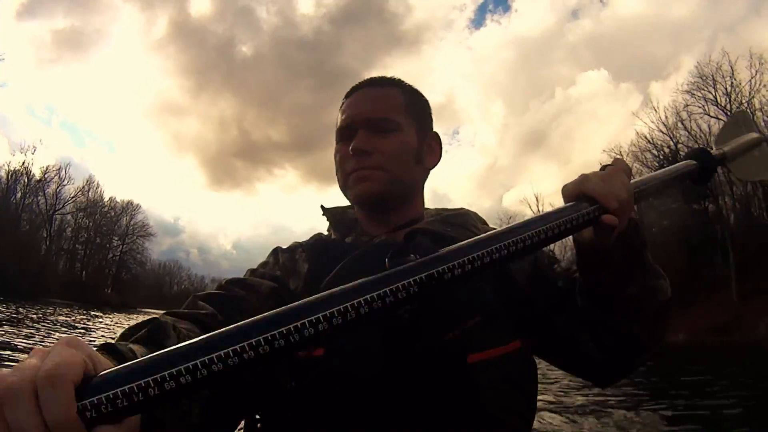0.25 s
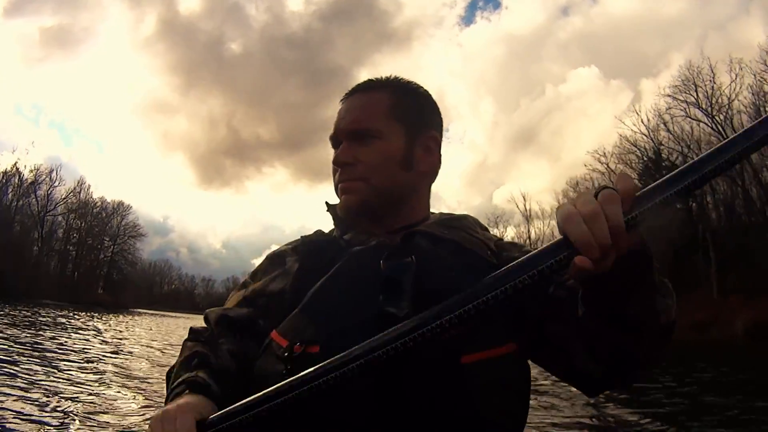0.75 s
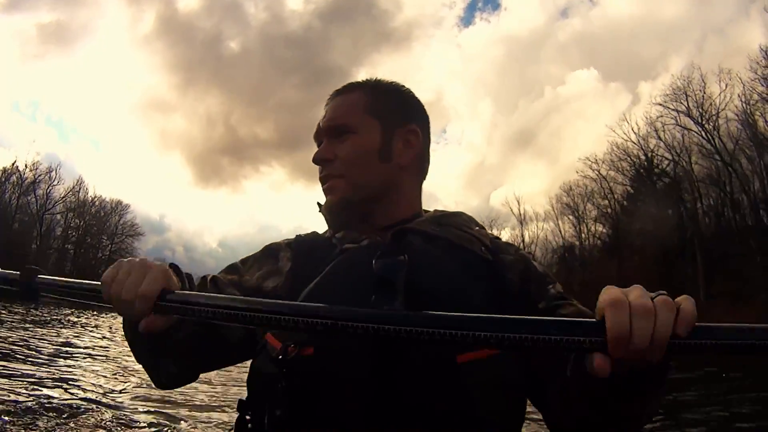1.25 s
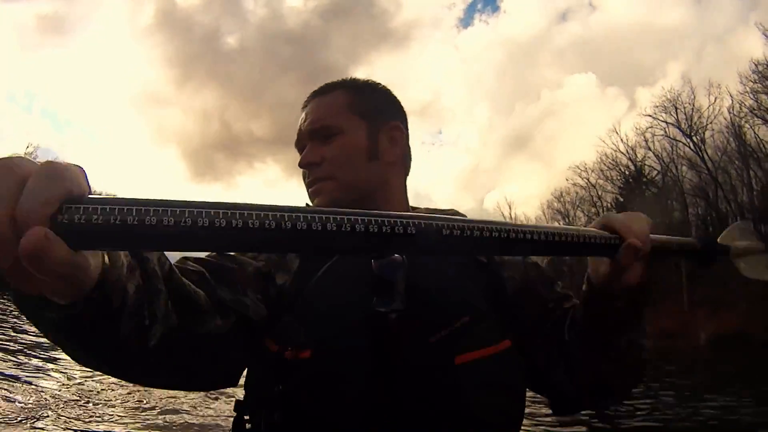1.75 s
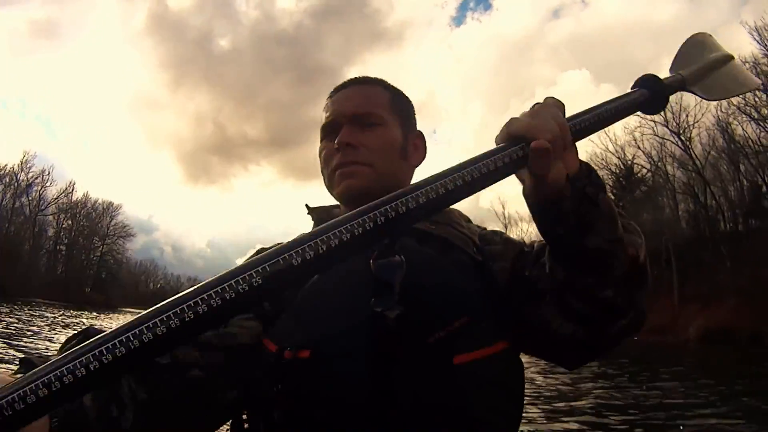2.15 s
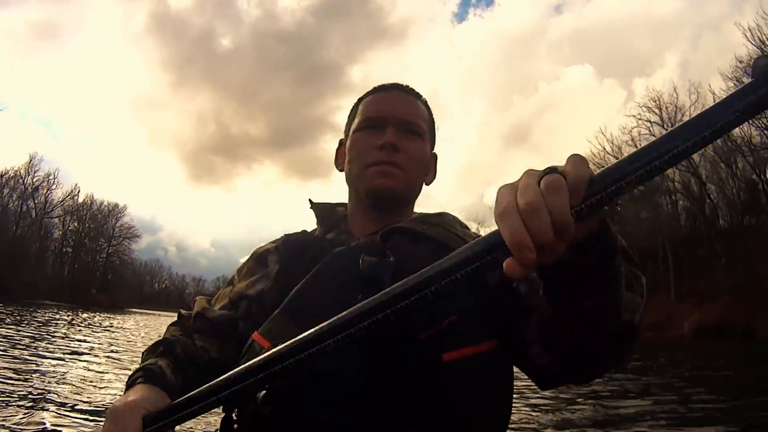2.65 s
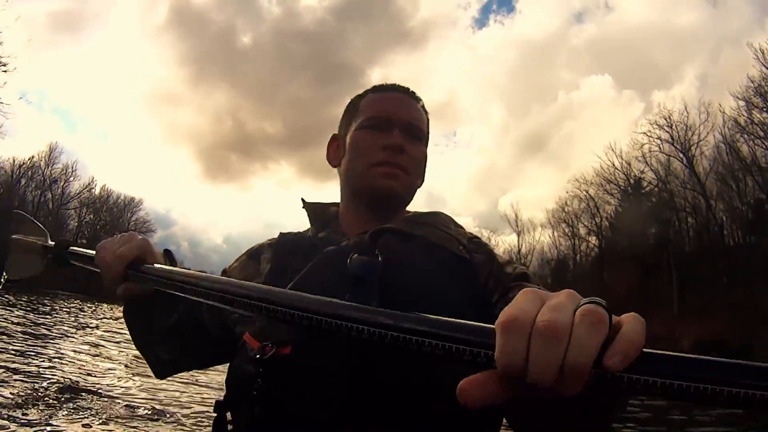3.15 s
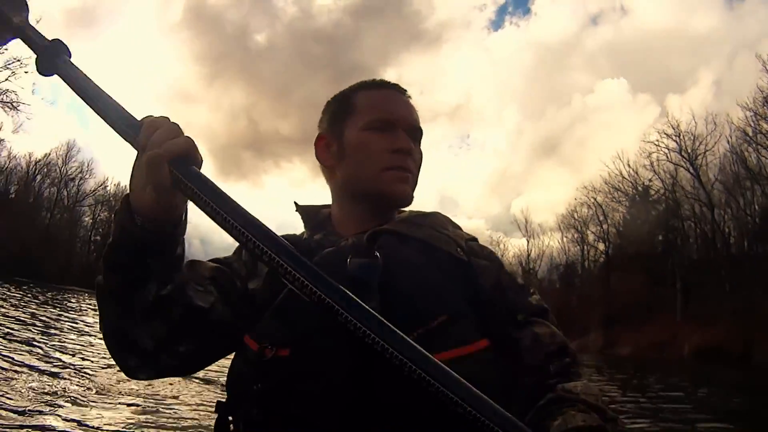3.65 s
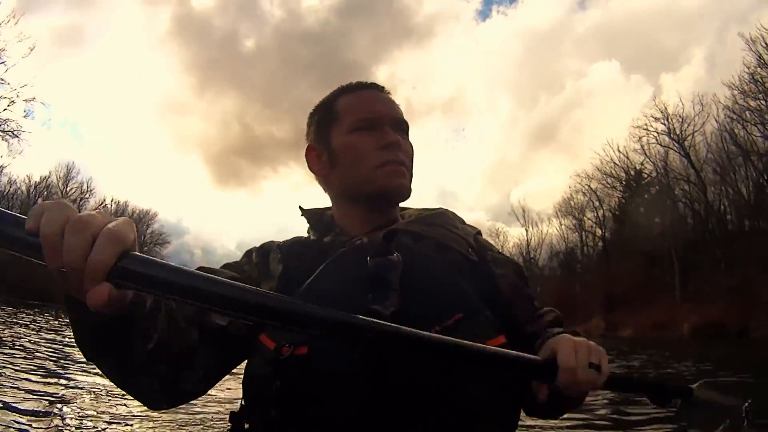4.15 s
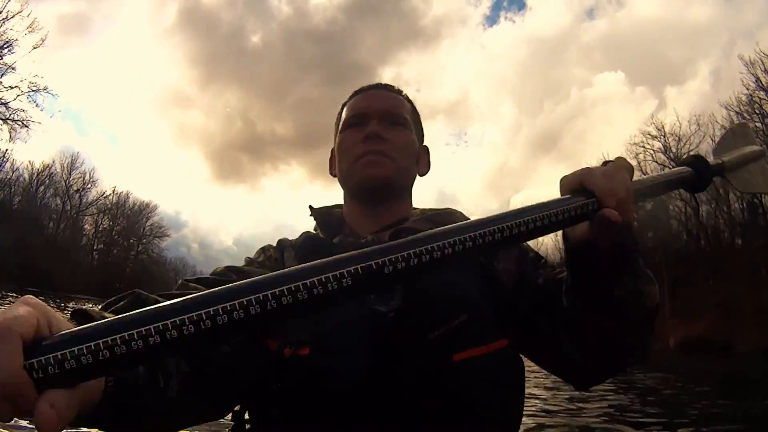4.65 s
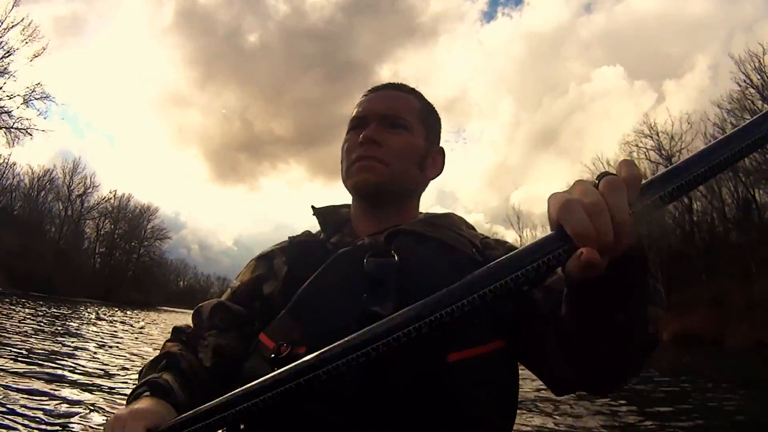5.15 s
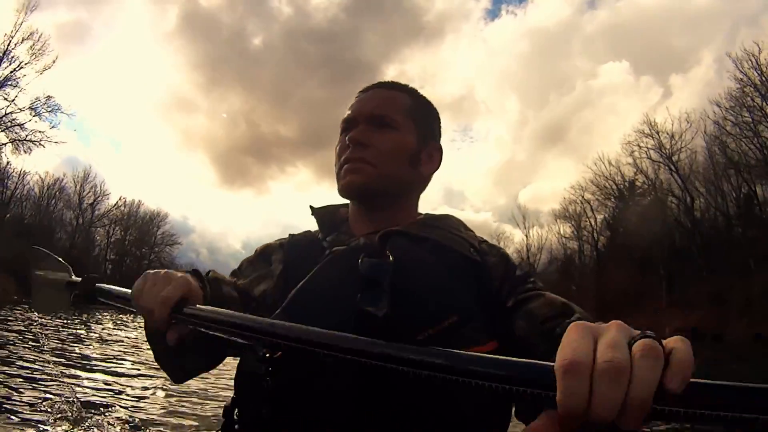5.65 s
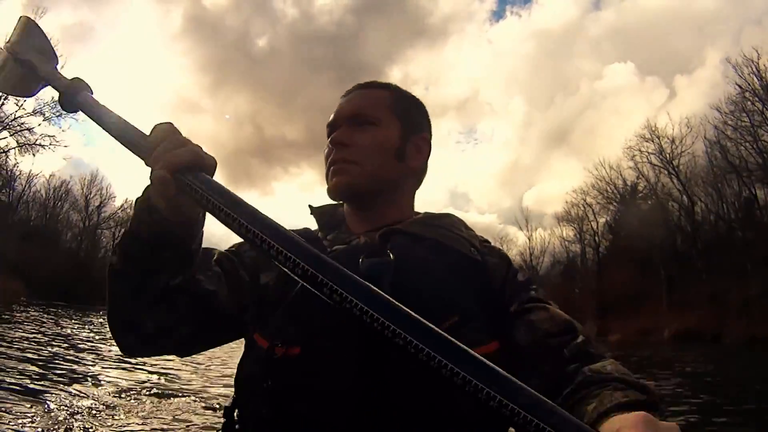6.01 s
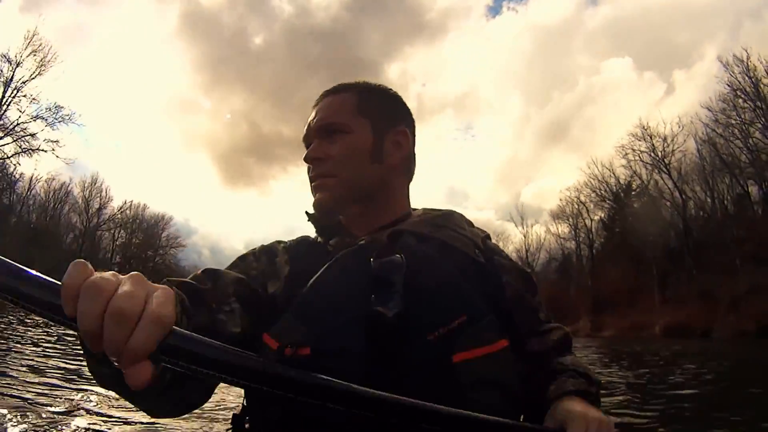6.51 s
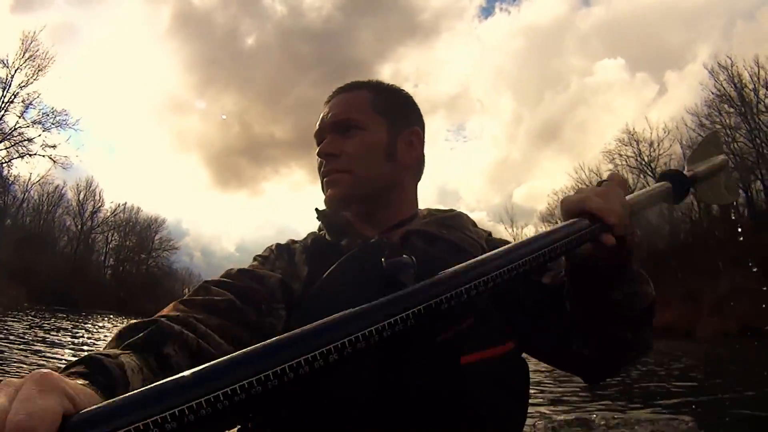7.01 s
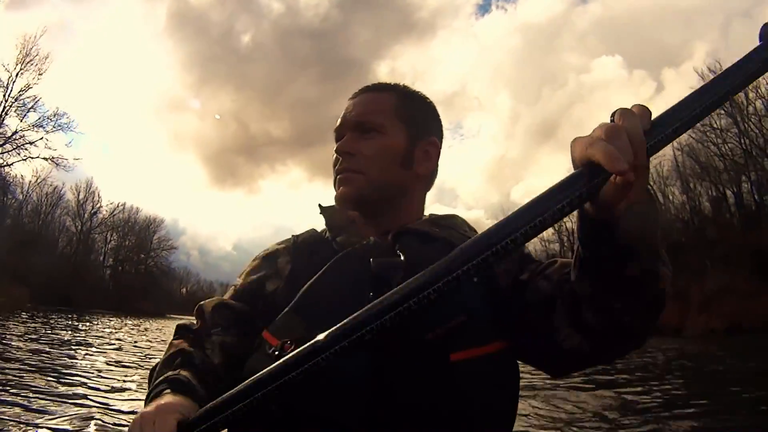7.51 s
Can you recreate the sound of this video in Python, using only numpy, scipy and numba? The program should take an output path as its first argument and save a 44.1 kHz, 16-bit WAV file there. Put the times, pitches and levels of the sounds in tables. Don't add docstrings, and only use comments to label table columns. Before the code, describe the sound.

A kayak paddle dips alternately left and right on a calm lake. Each lifted blade sheds a short bright splash, fine spray and trickling drops, with hollow bubbles plopping along the hull. A hard dull knock strikes the plastic near the middle, and another near the end bounces and scrapes. A tiny bird whistles faintly, very high. The microphone sits on the boat inside a closed, resonant case.

```python
import sys
import numpy as np
from numba import njit
from scipy import signal
from scipy.fft import rfft, irfft, next_fast_len
from scipy.io import wavfile
from scipy.ndimage import uniform_filter1d

SR = 44100
rng = np.random.default_rng(int(sys.argv[2]) if len(sys.argv) > 2 else 0)


def gain_from_decibels(decibels):
    exponent = np.asarray(decibels, float) / 20
    return 10 ** exponent


def to_wav(sig):
    pcm = np.clip(np.atleast_2d(sig), -1, 1) * 32767
    pcm = np.round(pcm).astype(np.int16)
    wavfile.write(sys.argv[1], SR, pcm.T)


N = 342857
T = np.arange(N) / SR
HZ = np.fft.rfftfreq(2 * next_fast_len(N // 2 + 2048), 1 / SR)
FRAMES = np.arange(0, N / SR + .002, .002)


def evened(x):
    return x / np.sqrt(np.mean(x ** 2) + 1e-20)


def read(points, hz, axis=1):
    table = np.transpose(points)
    return np.interp(np.log(hz + 1), np.log(table[0] + 1), table[axis])


def filtered(x, gain):
    size = 2 * (len(HZ) - 1)
    return irfft(rfft(x, size) * gain, size)[..., :N]


def add(mix, s, sound, pan_db=0):
    part = mix[:, round(s * SR):][:, :sound.shape[-1]]
    part += sound[..., :part.shape[1]] * gain_from_decibels(np.array([[pan_db / 2], [-pan_db / 2]]))


# pitch_hz, width_hz, level_db
CASE_MODES = [(98.1, 11, 6), (132, 50, 0), (500, 14.6, 7.5), (764, 47, 5), (1270, 120, 1.5), (1643, 270, 3),
              (2550, 780, 1.5), (5010, 490, -5.5)]


def housing():
    modes = (gain_from_decibels(db) / (1 + 1j * (HZ - f * f / (HZ + 1)) / width) for f, width, db in CASE_MODES)
    return 1 + sum(modes)


# freq_hz, density_db
LAKE_COLOUR = [(68, -10), (88, -0.5), (400, -8), (615, -16.5), (1950, -23.5), (3600, -16.5), (10600, -23),
               (11400, -34)]
LAKE_LEVEL_DB = -54
# time_s, level_db
SWELL = [(0, 0), (1.6, -2), (3.2, 3), (4.3, 1.5), (5.2, 0), (6.1, -3.5), (7.0, -0.5)]
# freq_hz, right_lead_rad, left_minus_right_db, coherence_0_to_1
PORT_PAIR = [(40, -0.67, -0.5, 0.95), (169.5, 0.61, 0.5, 0.99), (560, 1.78, -1.5, 1),
             (880, 1.77, -3.5, 0.6), (2050, 1.44, -3, 0.4), (2730, 0.99, 0.5, 0.24),
             (4630, 0.55, -3.5, 0.16), (10900, 1.08, 0.5, 1)]


def lake():
    frames, hz = N // 128 + 9, np.fft.rfftfreq(512, 1 / SR)
    a, b, c, d, patches = rng.standard_normal((frames, 257, 5)).T
    flicker = evened(uniform_filter1d(rng.standard_normal(frames), 5))
    patches = evened(uniform_filter1d(uniform_filter1d(patches, 5, 0), 12, 1))
    same = np.clip(read(PORT_PAIR, hz, axis=3), 0, 1)[:, None]
    left = a + 1j * b
    right = same * left + np.sqrt(1 - same ** 2) * (c + 1j * d)
    z = np.array([left, right]) * gain_from_decibels(2.0 * patches + 2.3 * flicker)
    z[:, hz < 250] *= gain_from_decibels(np.interp(np.arange(frames) * 128 / SR, *np.transpose(SWELL)))
    noise = signal.istft(z, nperseg=512, noverlap=384)[1][:, :N]
    return gain_from_decibels(LAKE_LEVEL_DB + 1.0) * evened(filtered(noise, gain_from_decibels(read(LAKE_COLOUR, HZ)) * housing()))


# time_s, left_minus_right_db, spray_over_splash_db
BLADE_SIDE = [(0, -2, -6.5), (1.2, 0, -5), (2.0, 0.5, -5.5), (3.0, 1, -7), (4.3, -3.5, -9), (5.1, 2.5, -6),
              (5.5, 0.5, -8), (6.7, -5, -6.5), (7.5, 0.5, -7.5)]


def blade(axis):
    table = np.transpose(BLADE_SIDE)
    return np.interp(T, table[0], table[axis])


def effort(db, start, length, rise, sag, fall):
    before = np.maximum(start - FRAMES, 0)
    during = np.clip(FRAMES - start, 0, length)
    after = np.maximum(FRAMES - start - length, 0)
    return gain_from_decibels(2 * (db - rise * before - sag * during - fall * after))


@njit(fastmath=True)
def burst(length, at, step, cycles, rise, size, swell):
    out = np.zeros((2, length))
    for k in range(len(at)):
        for n in range(min(int(2 / step[k]), length - at[k])):
            u = n * step[k]
            envelope = u * u / (u * u + swell * swell) * (1 - u / 2) ** 3
            tone = np.sin(2 * np.pi * cycles[k] * (u + rise[k] * u * u / 2)) * envelope
            out[0, at[k] + n] += tone * size[0, k]
            out[1, at[k] + n] += tone * size[1, k]
    return out


def grains(colour, per_s, cycles, spread_db, hiss, glide):
    clumps = gain_from_decibels(3.6 * evened(uniform_filter1d(rng.standard_normal(N), 700)))
    when, size, lean, kind, ring, bend = rng.random((6, int(per_s * N / SR)))
    at = np.searchsorted(np.cumsum(clumps) / clumps.sum(), when)
    low_hz, high_hz = colour[1][0], colour[-2][0]
    hz = low_hz * (high_hz / low_hz) ** kind
    turns = cycles * (0.38 + 2.27 * ring ** 2)
    sides = np.array([1.31 + 1.44 * lean, 1.4 - 0.44 * lean])
    size = gain_from_decibels(-spread_db * np.log(size + 0.067)) * hz / np.sqrt(turns) * sides
    bubbles = burst(N, at, hz / turns / SR, turns, glide * (bend - .35), size, 0.18)
    one, two = rng.standard_normal((2, N))
    sheet = np.array([one, 2.1 * one + 0.23 * two]) * np.sqrt(clumps)
    water = evened(bubbles) + hiss * evened(sheet)
    return evened(filtered(water, gain_from_decibels(read(colour, HZ)) * housing()))


# freq_hz, density_db
SPLASH_COLOUR = [(1060, -53), (1800, -11), (2080, -10.5), (2590, -2), (3840, -4.5), (5130, -3), (6500, -10),
                 (8450, -60)]
GURGLE_COLOUR = [(200, -8), (400, -5), (900, 8.5), (1700, -5.5), (2400, -3)]
SPRAY_COLOUR = [(4500, -2.5), (6200, 3.5), (8000, 6), (9600, -7.5), (10900, -2), (11300, -52)]
# start_s, length_s, splash_db, gurgle_db
BLADE_POURS = [(0.0, 0.069, -45.5, -53), (1.067, 0.19, -45.5, -61), (1.984, 0.052, -45, -79),
               (2.417, 0.035, -47.5, -57.5), (2.914, 0.053, -46, -55.5), (3.016, 0.19, -46, -55),
               (4.092, 0.07, -48, -57), (4.204, 0.27, -41.5, -60), (4.769, 0.022, -47.5, -57.5),
               (5.459, 0.024, -44, -76), (5.572, 0.24, -46.5, -60), (5.934, 0.12, -50.5, -86),
               (6.514, 0.28, -39, -52), (6.856, 0.16, -42.5, -60.5), (7.163, 0.27, -51, -75)]
# start_s, splash_db, gurgle_db
THROWN_GOUTS = [(0.366, -39, -79), (0.62, -45.5, -55), (0.911, -39, -49), (1.01, -48, -54),
                (2.82, -54, -55), (3.04, -38.5, -68), (3.721, -50, -41), (3.76, -48, -66),
                (4.2, -43, -51.5), (4.322, -33.5, -72), (5.49, -44.5, -54), (5.54, -65, -56),
                (6.558, -59, -74), (7.04, -61, -62), (7.11, -40, -71), (7.66, -60, -46),
                (7.747, -36.5, -40.5)]


def strokes():
    trickle_db, burble_db = -58, -63.5
    power = gain_from_decibels(2 * np.array([[trickle_db], [burble_db]])) * np.ones(len(FRAMES))
    for s, length, *db in BLADE_POURS:
        power = power + effort(np.c_[db], s, length, rise=303, sag=9.5, fall=126)
    for s, *db in THROWN_GOUTS:
        power = power + effort(np.c_[db], s, 0, rise=592, sag=0, fall=332)
    wet, deep = (np.interp(T, FRAMES, np.sqrt(p)) for p in power)
    splash = grains(SPLASH_COLOUR, per_s=1600, cycles=19.0, spread_db=4.7, hiss=.35, glide=.5)
    spray = grains(SPRAY_COLOUR, per_s=1800, cycles=13.6, spread_db=7.4, hiss=.82, glide=.2)
    spray = spray * gain_from_decibels(blade(axis=2))
    gurgle = grains(GURGLE_COLOUR, per_s=250, cycles=9.0, spread_db=2.2, hiss=.7, glide=.4)
    return (splash + spray) * wet * gain_from_decibels(-2.0) + gurgle * deep * gain_from_decibels(0.5)


def bubble(hz, cycles, rise, swell=0.086):
    u = np.arange(int(3 * cycles / hz * SR)) / SR * hz / cycles
    tone = np.sin(2 * np.pi * cycles * (u + rise * u * u / 2))
    return tone * (1 - np.exp(-(u / swell) ** 2)) * np.exp(-1.2 * u - u * u)


# time_s, peak_db, pitch_hz
LARGEST_BUBBLES = [(0.639, -50, 516), (0.662, -43.5, 477), (0.906, -54, 406), (1.511, -52, 510),
                   (2.618, -41.5, 538), (3.084, -46, 490), (3.117, -44.5, 425), (3.405, -39, 476),
                   (4.214, -40, 503), (4.44, -50, 500), (5.523, -42.5, 474), (5.775, -51, 490),
                   (6.433, -46, 501), (6.58, -42.5, 521)]
LARGE_BUBBLES = [(0.209, -46.5, 817), (0.656, -50.5, 780), (0.751, -46, 740), (0.785, -45.5, 774),
                 (0.914, -49.5, 664), (1.008, -45, 723), (1.2, -45, 740), (1.365, -36, 764),
                 (1.508, -48, 657), (1.701, -51, 780), (1.911, -47, 787), (2.065, -49, 740),
                 (2.765, -42, 773), (2.901, -45, 688), (3.064, -51, 764), (3.076, -45.5, 708),
                 (3.434, -41.5, 764), (3.607, -49, 727), (4.884, -46.5, 787), (5.051, -52, 750),
                 (5.141, -49.5, 795), (5.518, -50, 794), (5.613, -41, 700), (6.273, -46.5, 760),
                 (6.432, -37.5, 767), (6.684, -50, 783), (6.786, -44, 807), (7.036, -47.5, 747),
                 (7.474, -49.5, 730)]
SMALL_BUBBLES = [(0.611, -45, 1270), (1.053, -49, 1250), (1.6337, -55.5, 1270), (2.391, -48, 1760),
                 (2.4086, -50, 1520), (2.613, -43, 930), (2.644, -48.5, 893), (2.829, -49, 1590),
                 (2.9607, -42, 1610), (3.198, -48.5, 880), (3.237, -49, 913), (3.253, -49, 1116),
                 (4.124, -54, 1240), (4.144, -42.5, 913), (4.273, -44.5, 1220), (4.725, -50, 1510),
                 (4.889, -48, 1530), (5.091, -47, 867), (5.388, -51, 880), (5.3884, -50.5, 1580),
                 (5.4733, -51.5, 1170), (5.584, -43, 1560), (5.6102, -46, 1210), (5.145, -50.5, 1605),
                 (5.07, -53, 1550), (4.685, -54, 1750), (5.9747, -51, 1270), (6.563, -42.5, 1533),
                 (6.646, -38, 1476), (6.735, -41, 1250), (7.1034, -40.5, 2020), (7.317, -48.5, 897),
                 (7.3474, -43.5, 1320)]
# time_s, peak_db, pitch_hz
SPRAY_BEADS = [(0.357, -39, 2920), (0.376, -35, 5800), (0.607, -31, 5040), (0.91, -37, 4440),
               (0.993, -27, 7360), (1.016, -40, 2610), (1.061, -34.5, 3900), (1.07, -36.5, 2550),
               (1.111, -37, 2960), (1.118, -39, 2390), (2.893, -41, 6860), (3.128, -39, 3910),
               (3.17, -42, 3260), (4.201, -41, 3340), (4.215, -35, 5500), (4.262, -37, 3590),
               (4.311, -38, 3230), (4.323, -38, 5980), (4.323, -36, 3910), (4.323, -35, 4720),
               (4.363, -34, 5730), (5.475, -35.5, 4220), (5.476, -42, 5040), (5.497, -38, 3380),
               (6.053, -39, 2350), (6.261, -37.5, 3860), (6.516, -35, 5130), (6.543, -37, 5610),
               (6.557, -36, 5840), (6.598, -41, 3780), (6.608, -38, 4380), (6.662, -31.5, 2550),
               (6.68, -35, 2540), (6.681, -36, 3970), (6.709, -40, 5040), (6.709, -37, 4300),
               (6.711, -30.5, 3130), (6.744, -40, 2840), (6.763, -33, 5290), (6.778, -34, 7500),
               (6.848, -36.5, 5360), (6.862, -40, 3280), (6.905, -39, 2700), (6.925, -39, 3050),
               (7.345, -33, 2580)]
# time_s, peak_db, pitch_hz
DROWNED_BUBBLES = [(0.099, -45.5, 1260), (0.794, -49.5, 517), (0.899, -38.5, 1850), (0.911, -42, 1320),
                   (0.924, -42, 406), (1.485, -43.5, 766), (2.077, -42, 1290), (2.08, -42, 980),
                   (2.267, -50, 740), (2.378, -48.5, 500), (2.39, -49, 1200), (2.553, -46.5, 725),
                   (2.767, -48.5, 473), (2.895, -33, 1760), (2.898, -42, 1230), (3.054, -49, 1220),
                   (3.068, -53, 408), (3.077, -45, 760), (3.169, -53, 825), (3.255, -43, 940),
                   (3.626, -41.5, 742), (4.15, -48, 1190), (4.282, -44, 1760), (4.349, -50, 1260),
                   (4.367, -46, 1610), (4.437, -46, 1330), (5.553, -53, 470), (5.575, -48.5, 720),
                   (5.78, -45, 680), (5.883, -52, 500), (6.274, -47, 990), (6.433, -49, 1600),
                   (6.498, -47, 1800), (6.54, -54, 500), (6.691, -44, 1660), (6.727, -51, 500),
                   (6.734, -48, 910), (6.744, -43, 1750), (6.788, -49, 500), (7.149, -50, 710)]
# time_s, peak_db, pitch_hz, cycles
STRETCHED_BUBBLES = [
    (3.728, -45, 1500, 29.4),
    (3.853, -54, 820, 18),
    (7.205, -45, 4400, 120),
    (7.29, -44, 4200, 89),
    (7.22, -40, 2950, 25),
]
# time_s, peak_db
HULL_SLOPS = [(1.508, -53), (2.065, -41.5), (2.373, -53), (3.06, -47.5), (3.238, -50), (4.214, -44),
              (4.725, -51.5), (4.884, -46.5), (5.05, -51), (5.089, -46), (5.35, -49.5), (5.773, -68),
              (6.278, -47), (6.432, -47), (0.182, -50.5), (0.28, -53), (0.312, -54), (0.72, -52),
              (0.83, -51.5), (4.68, -54), (4.8, -55), (5.145, -55), (5.21, -54.5), (5.39, -53), (6.69, -47),
              (6.73, -48.5)]
# freq_hz, density_db
SLOP_COLOUR = [(120, -36), (300, 6.5), (700, 2.5), (1500, -6.5), (2500, -21), (6000, -41)]


def plops():
    out, slops, t = np.zeros((2, N)), np.zeros((2, N)), np.arange(2200) / SR
    for s, db, hz in LARGEST_BUBBLES:
        add(out, s - .004, gain_from_decibels(db + 6.0) * bubble(hz, 15.0, 0.0038, swell=0.2))
    for rows, cycles in ((LARGE_BUBBLES, 15.0), (SMALL_BUBBLES, 20.0)):
        for s, db, hz in rows:
            add(out, s - .004, gain_from_decibels(db + 10.5) * bubble(hz, cycles, 0.014, swell=0.31))
    for rows, cycles in ((SPRAY_BEADS, 22.0), (DROWNED_BUBBLES, 13.0)):
        for s, db, hz in rows:
            start = s + .003 - 0.357 * cycles / hz
            tone = gain_from_decibels(db + 4.0) * bubble(hz, cycles, 0.016, swell=0.14)
            add(out, start, tone, np.interp(s, T, blade(axis=1)))
    for s, db, hz, cycles in STRETCHED_BUBBLES:
        add(out, s, gain_from_decibels(db + 5.5) * bubble(hz, cycles, 0.2, swell=0.32))
    for (s, db), noise in zip(HULL_SLOPS, rng.standard_normal((len(HULL_SLOPS), 2, len(t)))):
        shape = (t / 0.01) * np.exp(1 - t / 0.0096)
        add(slops, s - .003, gain_from_decibels(db) * (noise[0] + .5 * noise) * shape)
    big = LARGE_BUBBLES + LARGEST_BUBBLES + SMALL_BUBBLES
    for (s, db, hz), (late, detune, weak) in zip(big, rng.random((len(big), 3))):
        follower = bubble(hz * (0.898 + 0.248 * detune), 11.7, 0.063, swell=0.29)
        add(out, s + .012 + .02 * late, gain_from_decibels(db + 2.0 - 8.5 * weak) * follower)
    return out + gain_from_decibels(4.0) * filtered(slops, gain_from_decibels(read(SLOP_COLOUR, HZ)) * housing())


# time_s, peak_db, brightest_hz, t60_s
DECK_DROPS = [(0.376, -37.5, 3040, 0.023), (0.6083, -37.5, 2780, 0.03), (0.6316, -40, 5300, 0.023),
              (0.9002, -36, 3700, 0.022), (0.9108, -33, 4600, 0.012), (0.9946, -24, 3900, 0.0031),
              (1.1877, -37, 4900, 0.033), (2.393, -41, 4900, 0.036), (2.551, -42, 8800, 0.0053),
              (2.563, -49, 9200, 0.006), (2.468, -41, 8360, 0.0073), (2.8963, -25, 4200, 0.0028),
              (3.0222, -35, 3330, 0.083), (3.694, -37, 5400, 0.01), (4.3118, -32, 4500, 0.008),
              (5.0806, -31, 7950, 0.0066), (5.473, -35.5, 2550, 0.019), (5.6082, -39, 5240, 0.014),
              (5.8578, -32, 2600, 0.011), (6.2447, -41, 2990, 0.015), (6.2617, -46, 3860, 0.015),
              (6.551, -33, 2940, 0.05), (6.7613, -35.5, 3120, 0.037), (7.045, -32, 7300, 0.0092),
              (7.1025, -37.5, 2130, 0.024), (7.2933, -44, 4660, 0.084), (7.3454, -37, 2520, 0.029),
              (7.7378, -28.5, 3420, 0.0053)]
# time_s, peak_db
WATER_DRIPS = [(1.046, -40), (1.419, -45), (2.9146, -39.5), (3.515, -42.5), (3.6115, -47), (4.0704, -51),
               (4.327, -53), (4.365, -40), (5.755, -42.5), (6.484, -42)]
# time_s, peak_db, brightest_hz
DROPLET_TICKS = [(4.4, -44, 1630), (4.757, -42, 3100), (4.956, -45, 4600), (5.091, -48, 3600),
                 (5.24, -47, 2500), (5.277, -43, 3900), (5.99, -38.5, 3300), (6.002, -37, 3130),
                 (6.216, -45.5, 2700), (6.229, -42, 5700), (4.307, -37, 5000), (4.206, -46, 1600),
                 (0.902, -37.5, 9300), (0.915, -32, 10300), (2.8965, -30.5, 7900), (4.0728, -44, 3000),
                 (7.75, -33, 11400), (6.7, -39, 8200), (7.532, -38.5, 4000), (3.714, -38.5, 2200)]
# time_s, peak_db
WATER_FLECKS = [(1.1674, -32.5), (1.2044, -33), (2.9314, -38), (3.1704, -36), (4.344, -29), (4.3894, -34),
                (6.884, -30), (6.9421, -30)]


def drops():
    out, t = np.zeros((2, N)), np.arange(2600) / SR
    hz = np.fft.rfftfreq(len(t), 1 / SR)
    rows = DECK_DROPS + [(s, db, 2730, .022) for s, db in WATER_DRIPS]
    rows += [(*row, .012) for row in DROPLET_TICKS]
    rows += [(s, db - 5, 5000, .008) for s, db in WATER_FLECKS]
    for (s, db, top_hz, t60), noise in zip(rows, rng.standard_normal((len(rows), 2, len(t)))):
        broad = .45 / (1 + (hz / (2.3 * top_hz)) ** 4) / (1 + (top_hz / (2 * hz + 1)) ** 2)
        peak = .8 / (1 + ((hz - top_hz) / (.12 * top_hz)) ** 2)
        spectrum = rfft(noise[0] + .5 * noise) * (broad + peak) * (hz < 11500)
        crack = evened(irfft(spectrum, len(t)))
        shape = gain_from_decibels(-60 * t / max(t60, .004)) + gain_from_decibels(-18.5 - 60 * t / 0.074)
        snap = np.minimum(t / (2.5 * t60 ** 2), 1)
        add(out, s, gain_from_decibels(db) * crack * shape * snap)
    return filtered(out, housing() / (1 + (1600 / (HZ + 1)) ** 4) * gain_from_decibels(1.0))


# start_s, length_s, lowest_hz, last_hz, level_db
RISING_WHISTLES = [(1.17, .23, 8620, 9000, -69), (1.75, .32, 8400, 8960, -63), (2.1, .3, 8380, 9350, -66),
                   (2.55, .23, 8920, 9130, -72), (3.4, .31, 8330, 8950, -54), (3.75, .3, 8370, 9470, -55),
                   (4.92, .25, 8880, 9080, -70), (5.3, .17, 8620, 8950, -71), (5.6, .34, 8420, 8920, -65),
                   (5.92, .28, 8340, 9350, -58), (7.26, .16, 8580, 8760, -68),
                   (7.47, .055, 8420, 8420, -61)]
# start_s, length_s, pitch_hz, level_db
LEVEL_NOTES = [
    (1.42, .1, 8620, -68),
    (2.82, .1, 8620, -68),
    (4.06, .08, 8620, -70),
    (5.19, .1, 8590, -71),
    (7.05, .1, 8620, -72),
]


def song():
    dip_hz, dip_s, dip_db, fade_db = 214, .04, -3, -10
    even_climb_hz = 700
    for s, length, low_hz, last_hz, db in RISING_WHISTLES:
        t = np.arange(0, length, 1 / SR)
        early = np.maximum(1 - t / dip_s, 0)
        late = np.maximum(t - dip_s, 0) / (length - dip_s)
        climb = last_hz - low_hz
        if climb > even_climb_hz:
            path = late ** 1.7 + .13 * np.sin(np.pi * np.minimum(late / .62, 1))
        else:
            path = late ** (climb / even_climb_hz)
        hz = low_hz + dip_hz * early ** 2 + climb * path
        yield s, hz, db + dip_db * early + fade_db * late ** 2
    for s, length, hz, db in LEVEL_NOTES:
        yield s, np.full(int(length * SR), hz), db


def bird():
    out = np.zeros((2, N))
    for s, hz, db in song():
        waver = evened(uniform_filter1d(rng.standard_normal((2, len(hz))), 300))
        turns = np.cumsum(hz + 18 * waver[0]) / SR
        tone = np.sqrt(2) * np.sin(2 * np.pi * turns) * gain_from_decibels(db + 3.0 + 2.0 * waver[1])
        add(out, s, tone * signal.windows.tukey(len(hz), .1), 2.5)
    t = np.arange(5000) / SR
    trees = rng.standard_normal((2, len(t))) * gain_from_decibels(-60 * t / 0.24)
    echo = signal.oaconvolve(out, trees / np.linalg.norm(trees[0]), axes=1)[:, :N]
    return out + gain_from_decibels(-3.0) * echo


PORT_LAG = 25


def lagged(noise, loose):
    return np.array([np.roll(noise[0], PORT_LAG) + loose * noise[1], noise[0]])


# time_s, strength_db, spot_index, rattle_db, rise_s
HULL_BLOWS = [
    (3.542, -38.5, 1, -6.5, 0.0032),
    (3.7135, -6, 0, -15, 0.0014),
    (7.5317, -6, 1, -15, 0.0024),
    (7.6369, -16, 1, -16, 0.005),
    (7.701, -23, 2, -9, 0.003),
    (7.745, -30.5, 2, -14.5, 0.008),
]
# pitch_hz, level_db, t60_s
HULL_MODES = [
    [(95.8, -20, 0.34), (126, 2, 0.095), (190, -9, 0.04), (318, -16, 0.15), (690, -15.5, 0.08),
     (980, -9, 0.012), (1700, -26.5, 0.017), (145, -25, 0.44)],
    [(99, 2, 0.23), (122, 6.5, 0.12), (151, -5, 0.16), (204, -9, 0.15), (345, -14, 0.093),
     (490, -15.5, 0.2), (727, -13, 0.21), (910, -1.5, 0.017)],
    [(105, -3, 0.15), (150, 3, 0.13), (210, 4.5, 0.12), (535, -10, 0.076), (1050, -22, 0.025)],
]
# freq_hz, density_db
RATTLE_COLOUR = [(70, -16), (150, -1.5), (300, -4), (850, -15), (1150, -31), (2000, -37), (9000, -60)]
# time_s, level_db, direction_sign, length_s
OPPOSED_PULSES = [
    (3.7152, -14, 1, .002),
    (3.7224, -4.5, 1, .0018),
    (7.5363, -3, -1, .003),
]


def knocks():
    out, t = np.zeros((2, N)), np.arange(SR // 2) / SR
    lag = np.maximum(t - np.array([[PORT_LAG / SR], [0]]), 0)
    gear = gain_from_decibels(read(RATTLE_COLOUR, np.fft.rfftfreq(len(t), 1 / SR)))
    noises = rng.standard_normal((len(HULL_BLOWS), 2, len(t)))
    for (s, db, spot, rattle_db, rise), noise in zip(HULL_BLOWS, noises):
        swell = np.exp(-lag / max(rise, .0005))
        ring = 0
        for f, mode_db, t60 in HULL_MODES[round(spot)]:
            mode = gain_from_decibels(mode_db - 60 * lag / t60) * np.sin(2 * np.pi * f * lag)
            ring = ring + mode * (1 - swell ** (f / 130))
        rattle = evened(irfft(rfft(lagged(noise, 0.33)) * gear))
        rattle = rattle * gain_from_decibels(rattle_db - 60 * t / 0.18) * (1 - swell ** 3)
        add(out, s, gain_from_decibels(db) * (ring + rattle))
    low = 66 / (1j * (HZ + 1))
    out = filtered(out, 1 / (1 + 2.07 * low + low ** 2) ** 2)
    for s, db, direction, length in OPPOSED_PULSES:
        push = np.sign(direction) * np.hanning(int(length * SR))
        add(out, s, gain_from_decibels(db) * push * np.array([[1], [-1]]))
    return out


# start_s, length_s, level_db
RIM_SCRAPES = [
    (3.721, 0.05, -42),
    (7.539, 0.067, -30.5),
    (7.629, 0.046, -32.5),
    (7.703, 0.028, -42),
    (7.742, .03, -49),
]
# freq_hz, density_db
SCRAPE_COLOUR = [(150, 4), (330, -6), (500, 1), (620, -7), (780, 1), (1000, -9), (1400, -32), (3000, -47)]


def scrapes():
    out = np.zeros((2, N))
    for (s, length, db), noise in zip(RIM_SCRAPES, rng.standard_normal((len(RIM_SCRAPES), 2, SR // 8))):
        t = np.arange(noise.shape[1]) / SR
        shape = np.minimum(t / 0.0036, 1) * gain_from_decibels(-1500 * np.maximum(t - length, 0))
        add(out, s, gain_from_decibels(db) * shape * lagged(noise, 0.34))
    return gain_from_decibels(12.0) * filtered(out, gain_from_decibels(read(SCRAPE_COLOUR, HZ)) * housing())


def scene():
    pan_db = blade(axis=1) / 2
    water = (strokes() + drops()) * gain_from_decibels(np.array([pan_db, -pan_db]))
    air = lake() + water + plops() + bird()
    half, tilt_db = read(PORT_PAIR, HZ) / 2, read(PORT_PAIR, HZ, axis=2) / 2
    ports = np.array([gain_from_decibels(tilt_db) * np.exp(-1j * half), gain_from_decibels(-tilt_db) * np.exp(1j * half)])
    ports = ports / np.maximum(np.cos(half), .3)
    return filtered(air, ports) + knocks() + scrapes()


def top_cut(x):
    return signal.sosfilt(signal.butter(12, 12230, fs=SR, output="sos"), x)


def record(dry):
    held = np.clip(dry, -.94, .94)
    held = filtered(held, 1 / (1 + (HZ / 11200) ** 140))
    return top_cut(held)


dry = scene()
out = record(dry)
to_wav(out)
```